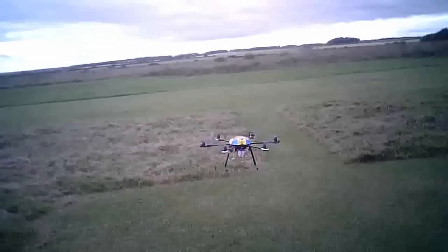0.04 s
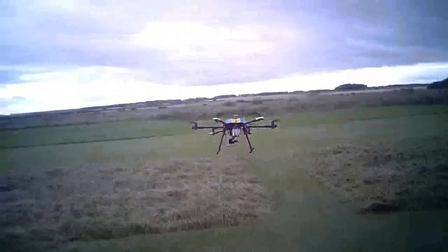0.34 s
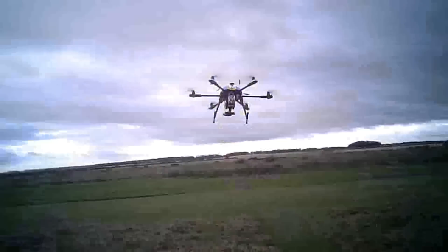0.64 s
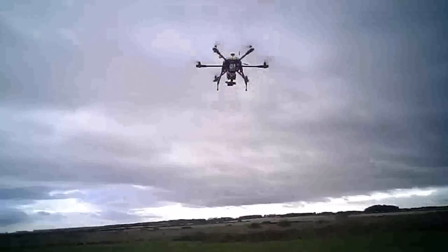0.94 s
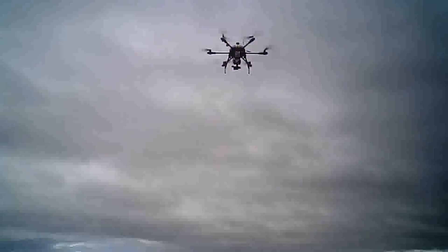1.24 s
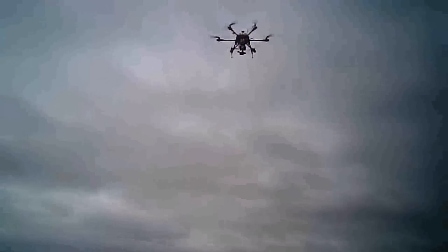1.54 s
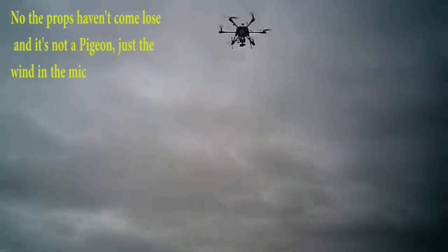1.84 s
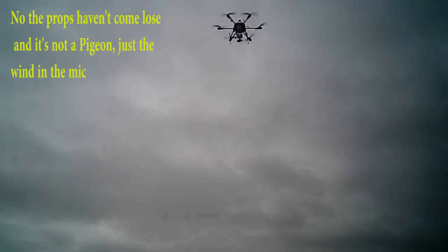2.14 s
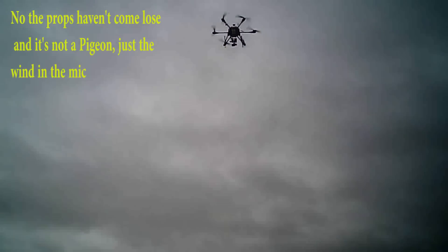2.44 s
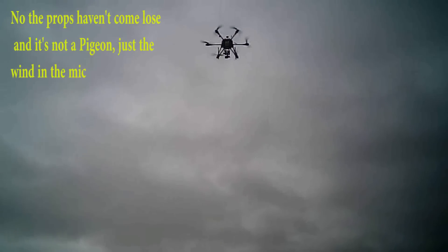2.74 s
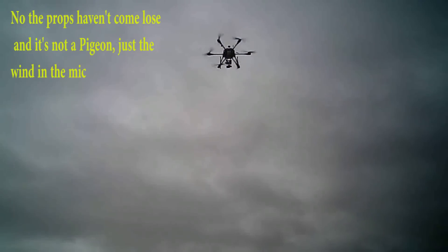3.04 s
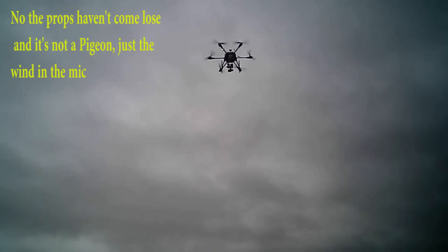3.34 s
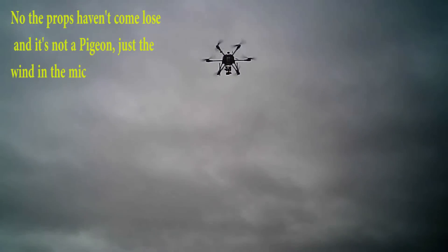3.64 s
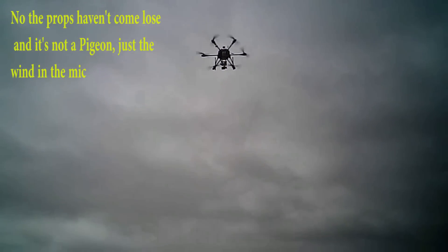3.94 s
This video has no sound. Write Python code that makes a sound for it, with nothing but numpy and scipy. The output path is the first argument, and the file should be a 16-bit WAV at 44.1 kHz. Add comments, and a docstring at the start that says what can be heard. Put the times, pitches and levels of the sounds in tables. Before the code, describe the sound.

Wind rumbles and roars on an outdoor microphone, then breaks into fluttering, hooting tones that sink in pitch, with short thumps and pops. Behind it a drone's motors whine thinly and its propellers buzz and hiss.

```python
"""Wind on a microphone: turbulent pressure rumbles and roars, with short buffets and pops, and the
flow across an edge of the camera sounds fluttering, pigeon-like edge tones that sink in pitch.
Behind the wind a six-rotor drone climbs over a field: its motors whine at a multiple of the shaft
rate, and its propellers buzz at the blade-passing harmonics and hiss.
Gain control ducks the loudest gusts."""
import sys
import numpy as np
from scipy import signal
from scipy.fft import rfft, irfft
from scipy.io import wavfile
from scipy.ndimage import uniform_filter1d

SR = 44100
rng = np.random.default_rng(int(sys.argv[2]) if len(sys.argv) > 2 else 0)


def materialize(psi):
    """Save the field psi as 16-bit PCM at rate SR to the path in sys.argv[1].

    A 1-D psi becomes a single channel; in a 2-D psi each row is a channel.
    """
    bounded = np.clip(np.atleast_2d(psi).T, -1, 1)
    quanta = np.round(bounded * 32767).astype(np.int16)
    wavfile.write(sys.argv[1], SR, quanta)


N = 176400


def amp(db):
    """Amplitude ratio of a level in decibels."""
    return 10 ** (np.asarray(db) / 20)


def unit(x):
    """Normalisation to rms 1."""
    return x / np.sqrt(np.mean(x ** 2) + 1e-20)


def curve(points, column=1):
    """Linear interpolation of one column of a time table at every sample."""
    table = np.array(points)
    return np.interp(np.arange(N) / SR, table[:, 0], table[:, column])


def colour(spectrum, hz):
    """Gain of a spectrum table at hz, interpolated in level over log frequency."""
    f, db = np.transpose(spectrum)
    return amp(np.interp(np.log(hz + 1e-6), np.log(f), db))


def noise(spectrum, scale=1):
    """Spectral shaping of white noise, the table's frequencies multiplied by scale."""
    f = np.fft.rfftfreq(N, 1 / SR)
    return unit(irfft(rfft(rng.standard_normal(N)) * colour(spectrum, f / scale), N))


def wander(hz):
    """Random fluctuation of rms 1: noise through a Gaussian low-pass of width hz."""
    f = np.fft.rfftfreq(N, 1 / SR)
    return unit(irfft(rfft(rng.standard_normal(N)) * np.exp(-(f / hz) ** 2 / 2), N))


def steady(x, span_s=0.0606):
    """Division by the running rms, which leaves only the fast fluctuations of level."""
    return x / np.sqrt(abs(uniform_filter1d(x ** 2, int(span_s * SR) + 1)) + 1e-9)


def gate(t, edge_s):
    """Flat envelope with a quarter-sine rise and fall."""
    return np.sin(np.pi / 2 * np.clip(np.minimum(t, t[-1] - t) / edge_s, 0, 1))


def add(mix, start_s, sound):
    """Superposition of a sound on the mix from start_s."""
    part = mix[max(round(start_s * SR), 0):][:len(sound)]
    part += sound[:len(part)]


def rotors():
    """Rotational harmonics: six motors whine, and their two-blade propellers buzz at even orders."""
    # two motors that hold the drone against the wind: t/s, whine f/Hz, level/dB
    motor_a = [(0, 4520, -53), (.11, 4456, -53), (.18, 4333, -44.5), (.24, 4500, -49), (.32, 4780, -63),
               (.5, 4520, -59), (.65, 4650, -68), (1.05, 4520, -72), (1.24, 4630, -69), (1.27, 4610, -60),
               (1.45, 4370, -58), (1.65, 4043, -67), (2.66, 4155, -63), (2.77, 4270, -47),
               (2.83, 4360, -57), (2.92, 4430, -48.5), (2.97, 4306, -73), (4, 4150, -70)]
    motor_b = [(0, 4187, -59), (.27, 4064, -47.5), (.35, 3953, -45), (0.459, 4043, -43.5),
               (0.581, 4046, -44), (0.719, 4140, -45.5), (.85, 4180, -42), (0.979, 4074, -50),
               (1.07, 3930, -68), (1.14, 4430, -55), (1.22, 4330, -67), (1.33, 4350, -54),
               (1.492, 4415, -52), (1.66, 4190, -61), (1.9, 4240, -79), (4, 3980, -62)]
    # course shared by the other four: t/s, whine f/Hz, level/dB
    common = [(0, 4118, -49), (.15, 4030, -52), (.32, 3893, -66), (.5, 3950, -51), (.68, 4095, -50.5),
              (.92, 4130, -52), (1.08, 3854, -64), (1.25, 4247, -60), (1.47, 4136, -52.5),
              (1.62, 3940, -78), (2.55, 3806, -76), (2.88, 4185, -55), (3.1, 3896, -56), (3.6, 4223, -54),
              (4, 4032, -58)]
    # their offsets from that course: speed ratio, relative level/dB
    offsets = [(0.98, -1), (.96, -5), (.925, -5.5), (.885, -6)]
    # spectral envelope of the blade harmonics: f/Hz, relative level/dB
    blade_spectrum = [(180, -13), (400, 4.5), (700, 0.5), (1300, 6.5), (2000, 2), (2450, -2), (2900, -30),
                      (3500, -12), (4200, 2), (5000, -21)]
    # buzz of all blades together: t/s, level/dB
    buzz_level = [(0, -40), (.2, -36.5), (.6, -42.5), (.95, -46.5), (1.1, -54), (2.4, -53), (3.0, -46),
                  (3.6, -40.5), (4, -45)]
    whine_order = 42  # cycles per turn
    trim, jitter = .006, .0016  # slow and fast relative wander of speed
    swell_db, scatter_db = 3, 6.5  # blade harmonics swell in the gusts and are uneven in strength
    motors = [(curve(motor), curve(motor, column=2)) for motor in (motor_a, motor_b)]
    for ratio, db in offsets:
        motors.append((curve(common) * ratio * (1 + trim * wander(4)), curve(common, column=2) + db))
    whine, buzz = np.zeros(N), np.zeros(N)
    for hz, db in motors:
        shaft_hz = uniform_filter1d(hz, size=900) * (1 + jitter * wander(36.3)) / whine_order
        turn = 2 * np.pi * np.cumsum(shaft_hz) / SR
        throb = 1 + 0.27 * np.sin(turn)
        whine += np.sqrt(2) * np.sin(whine_order * turn) * throb * amp(db + 2.5 * wander(36))
        swells = [amp(swell_db * wander(14)) for _ in range(4)]
        for k in range(1, 28):
            gain = colour(blade_spectrum, 2 * k * shaft_hz.mean())
            gain *= amp(scatter_db * rng.uniform(-1.7, 1))
            buzz += gain * swells[k % len(swells)] * np.sin(2 * k * turn + 2 * np.pi * rng.random())
    return whine + amp(curve(buzz_level)) * unit(buzz)


def propeller_wash():
    """Broadband flow noise: the air driven by the propellers makes a low wash and a flickering hiss."""
    # envelopes: t/s, level/dB
    wash_level = [(0, -36.5), (.2, -45), (.5, -39.5), (.9, -38), (1.07, -48), (1.5, -39), (2.3, -40),
                  (2.7, -37.5), (3.0, -37), (3.3, -34.5), (3.62, -32.5), (3.8, -36), (4, -35)]
    hiss_level = [(0.02, -50), (0.2, -51.5), (0.86, -51), (1.05, -57.5), (1.43, -54.5), (1.53, -57.5),
                  (1.68, -55.5), (2.26, -55), (2.48, -57.5), (2.53, -53), (3.02, -53), (3.44, -49.5),
                  (3.76, -50), (3.79, -56), (3.9, -52.5), (3.97, -55)]
    # spectra, the hiss with the microphone's ripple: f/Hz, relative level/dB
    wash_spectrum = [(100, 7), (400, 3), (900, -3), (1400, -2), (1900, 0), (2400, -18), (2900, -19),
                     (5000, -52)]
    hiss_spectrum = [(1000, -85), (2400, -11.5), (2950, -13.5), (3550, -1), (4150, -1), (4700, -5.5),
                     (5300, -8), (6100, -9.5), (6700, -8), (7500, -17), (8600, -18.5), (9700, -11.5),
                     (10700, -15), (11800, -20), (13300, -11), (14500, -22), (15700, -22)]
    hiss_boost_db, flicker_db = 4, 0.74
    wash = amp(curve(wash_level)) * noise(wash_spectrum)
    hiss = amp(curve(hiss_level) + hiss_boost_db + flicker_db * wander(60)) * noise(hiss_spectrum)
    return wash + hiss


def pops(hz=509, decay_s=0.0011):
    """Heavily damped oscillation: each pressure kick of the air stream dies within a few cycles."""
    # kicks: t/s, envelope peak level/dB
    kicks = [(.875, -27), (1.644, -35), (2.052, -19), (2.335, -22), (2.687, -14.5), (2.71, -23),
             (2.799, -15), (3.027, -12), (3.143, -19), (3.167, -16.5), (3.7, -31), (3.777, -14),
             (3.965, -13)]
    out, t = np.zeros(N), np.arange(900) / SR
    envelope = t / decay_s * np.exp(1 - t / decay_s)
    for start, db in kicks:
        add(out, start, amp(db) * envelope * np.sin(2 * np.pi * hz * t))
    return out


def buffets():
    """Transient pressure of eddies striking the microphone: short, hollow bursts of band noise."""
    # eddies: start t/s, end t/s, centre f/Hz, level/dB
    eddies = [(0.966, 1.006, 396, -21.5), (1.452, 1.506, 560, -31.5), (1.938, 1.977, 590, -26.5),
              (2.166, 2.182, 592, -23), (2.592, 2.628, 485, -23), (2.667, 2.714, 502, -26.5),
              (2.777, 2.81, 366, -21.5), (2.9, 2.917, 441, -21.5), (2.926, 2.98, 356.4, -19),
              (3.023, 3.058, 468, -27), (3.135, 3.192, 440, -30), (3.612, 3.649, 507, -23),
              (3.694, 3.708, 607.5, -27), (3.748, 3.795, 268.5, -18), (3.806, 3.869, 368, -23),
              (3.885, 3.91, 304, -19.5), (3.911, 3.964, 405, -22)]
    # spectrum of a burst: ratio to centre frequency, relative level/dB
    spectrum = [(.1, -19), (.4, -8), (.8, -3.5), (1.2, -3), (1.8, -13.5), (3, -24.5), (4.5, -36), (7, -46),
                (30, -78)]
    out = np.zeros(N)
    for start, end, hz, db in eddies:
        t = np.arange(0, max(end - start, .01), 1 / SR)
        burst = noise(spectrum, hz)[:len(t)] * gate(t, edge_s=0.0019)
        add(out, start, amp(db) * unit(burst))
    return out


def hoots():
    """Edge tone: flow oscillates at an edge; puffs bend its pitch, turbulence adds warble and rasp."""
    # puffs: start, end t/s; first, middle, last f/Hz; fundamental, overtone level/dB; roughness 0-1
    puffs = [(1.265, 1.315, 726, 703, 730, -54, -36, 0.14),
             (1.297, 1.352, 713, 742, 722, -41.5, -28.5, 0.41),
             (1.344, 1.406, 684, 708, 646, -40.5, -33, 0.3), (1.406, 1.48, 649, 635, 613, -48, -33, 0.2),
             (1.456, 1.521, 658, 691, 613, -38, -25, 0.47),
             (1.524, 1.597, 676, 629, 637, -30.5, -31.5, 0.72),
             (1.603, 1.656, 585, 514, 527, -66, -40, 0.2), (1.643, 1.73, 593, 574, 546, -35, -25.5, 0.65),
             (1.733, 1.798, 548, 591, 623, -26.5, -27.5, 0.61),
             (1.803, 1.829, 582, 650, 685, -21.5, -26.5, 0.3), (1.857, 1.882, 480, 603, 702, -26, -30, .3),
             (1.886, 1.96, 599, 515.6, 383, -41, -25.5, 0.6), (1.958, 1.999, 558, 534, 560, -36, -30, 0.43),
             (2.013, 2.039, 578, 541, 495, -38, -26.5, 0.62),
             (2.045, 2.123, 518, 533, 520, -29.5, -28.5, 0.43),
             (2.142, 2.167, 382, 414, 427, -33, -29.5, 0.16),
             (2.177, 2.252, 545, 536, 497, -30.5, -33, 0.77),
             (2.258, 2.289, 524, 518, 472, -29.5, -33, 0.85), (2.307, 2.321, 453, 420, 443, -46, -23, 0.37),
             (2.332, 2.47, 448.3, 488.4, 476, -23, -28.5, 0.29),
             (2.466, 2.55, 405, 429, 492, -27, -32, 0.49), (2.556, 2.592, 429, 463, 515, -32, -31, 0.65),
             (2.727, 2.751, 384, 397, 388, -27, -31.5, 0.35),
             (2.843, 2.892, 374, 427.5, 435, -30, -34, 0.77),
             (3.058, 3.107, 365, 387.5, 377, -28.5, -33, .15),
             (3.121, 3.196, 349.4, 373.6, 395, -33.5, -35.5, 0.34),
             (3.246, 3.371, 336, 375, 400, -34, -37, 0.43),
             (3.378, 3.531, 367, 404.2, 492, -32.5, -34, 0.66),
             (3.537, 3.652, 429.5, 463.5, 463, -32, -35, 0.92)]
    # weighting of the overtones: f/Hz, relative level/dB
    overtone_spectrum = [(1500, -4.5), (1950, -0.5), (2300, -29), (3000, -14), (4000, -13)]
    # breathy noise: ratio to middle frequency, relative level/dB
    rasp_spectrum = [(.5, -6), (1.4, 2.5), (2.6, -1.5), (3.6, -7.5), (4.8, -11.5), (6.3, -25), (9, -39),
                     (18, -55)]
    warble_depth, flutter_db, growth_db, rasp_db = 0.084, 6, 9.5, -10  # at roughness 1
    warble, low_flutter, high_flutter, air = wander(131), wander(101.8), wander(96), wander(90)
    out = np.zeros(N)
    for start, end, first, middle, last, fundamental_db, overtone_db, rough in puffs:
        t = np.arange(0, max(end - start, .01), 1 / SR)
        span = round(start * SR) + np.arange(len(t))
        hz = np.polyval(np.polyfit([0, .5, 1], [first, middle, last], 2), t / t[-1])
        warbled_hz = hz * (1 + warble_depth * rough * warble[span])
        phase = 2 * np.pi * (np.cumsum(warbled_hz) / SR + rng.random())
        harmonics = [(2, 0), (3, -17.5 + growth_db * rough), (4, -27.5 + growth_db * rough)]
        overtones = sum(amp(db) * colour(overtone_spectrum, k * hz) * np.sin(k * phase)
                        for k, db in harmonics)
        overtones += rough * air[span] * np.cos(2 * phase)  # noise band around the octave
        tone = amp(fundamental_db) * unit(np.sin(phase) * amp(flutter_db * rough * low_flutter[span]))
        tone += amp(overtone_db) * unit(overtones * amp(flutter_db * rough * high_flutter[span]))
        rasp = amp(overtone_db + rasp_db) * np.sqrt(rough) * noise(rasp_spectrum, middle)[span]
        add(out, start, (tone + rasp) * gate(t, edge_s=0.0063))
    return out


def wind(gust_db=2, gust_hz=41.7):
    """Turbulent pressure fluctuations on the microphone: three noise bands, randomly modulated."""
    # spectra of the bands, low to high: f/Hz, relative level/dB
    rumble = [(5, -26), (20, -11), (40, -8), (70, 1.5), (110, -18), (250, -4), (800, -75)]
    body = [(20, 2), (60, -4), (100, 1), (150, 0), (200, -4), (270, -12), (400, -17.5), (1200, -37),
            (4000, -64)]
    roar = [(50, -25), (130, -4), (200, -1), (300, -3.5), (550, -10), (900, -19), (1700, -27.5),
            (2800, -57), (8000, -68)]
    # their envelopes: t/s, level/dB
    rumble_level = [(0.0, -35), (0.27, -31), (0.29, -49), (0.39, -34), (0.92, -22), (1.09, -44),
                    (1.44, -24.5), (2.72, -35.5), (2.8, -31), (3.13, -36), (3.38, -31.5), (3.44, -43),
                    (3.72, -25), (3.78, -44), (3.89, -27.5), (4.0, -35)]
    body_level = [(0, -29.5), (.3, -28), (.45, -27.5), (.58, -23), (.85, -25), (1.01, -18), (1.08, -23),
                  (1.3, -24), (1.6, -27.5), (2.05, -26.5), (2.2, -26), (2.28, -33.5), (2.329, -22),
                  (2.4, -35.5), (2.55, -40), (2.61, -21.5), (2.74, -33), (2.81, -16), (2.85, -35),
                  (2.94, -19), (3.11, -40), (3.15, -22.5), (3.22, -34), (3.45, -41), (3.64, -27),
                  (3.72, -38), (3.761, -34), (4, -30)]
    roar_level = [(0, -55), (.42, -36), (0.601, -27.5), (.7, -25.5), (.87, -24.5), (0.999, -24.5),
                  (1.08, -26), (1.2, -24.5), (1.35, -31.5), (1.55, -30), (1.63, -34.5), (1.95, -32),
                  (2.12, -38), (2.5, -43), (2.62, -29.5), (2.84, -43), (2.999, -38), (3.251, -44.5),
                  (3.5, -37.5), (3.58, -29), (3.68, -36), (3.82, -26.5), (4, -32.5)]
    out = np.zeros(N)
    for spectrum, level in [(rumble, rumble_level), (body, body_level), (roar, roar_level)]:
        turbulence = noise(spectrum) * amp(gust_db * wander(gust_hz))
        out += amp(curve(level)) * steady(turbulence)
    return out


def scene():
    """Superposition of the drone and the louder wind in one channel."""
    drone = rotors() + propeller_wash()
    return (drone + wind() + hoots() + buffets() + pops())[None]


def record(dry):
    """Dynamic range compression with fast attack and slow release, then a low-pass band limit."""
    threshold_db, reduction_per_db, release_db_per_s, cutoff_hz = -13.5, 0.61, 31, 15700
    power_db = 10 * np.log10(abs(uniform_filter1d(dry[0] ** 2, size=130)) + 1e-12)
    release_db = np.arange(N) * release_db_per_s / SR
    held_db = np.maximum.accumulate(power_db + release_db) - release_db  # decaying peak hold
    excess_db = np.maximum(held_db - threshold_db, 0)
    ducked = dry * amp(-reduction_per_db * uniform_filter1d(excess_db, size=130))
    low_pass = signal.firwin(511, cutoff_hz, window=("kaiser", 9), fs=SR)
    return signal.oaconvolve(ducked, low_pass[None], "same")


dry = scene()
out = record(dry)
materialize(out)
```